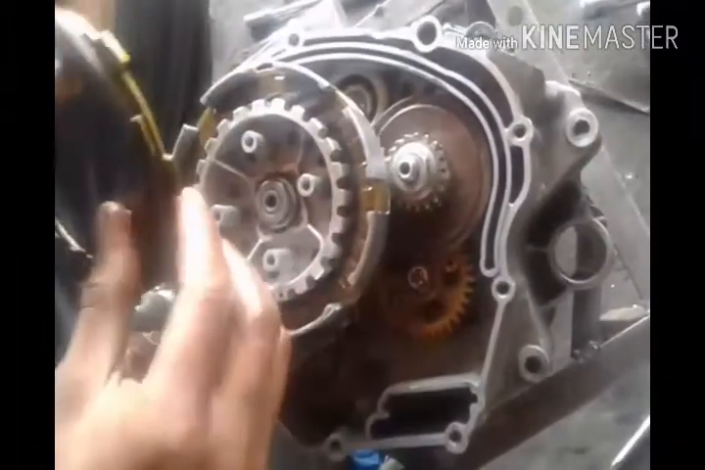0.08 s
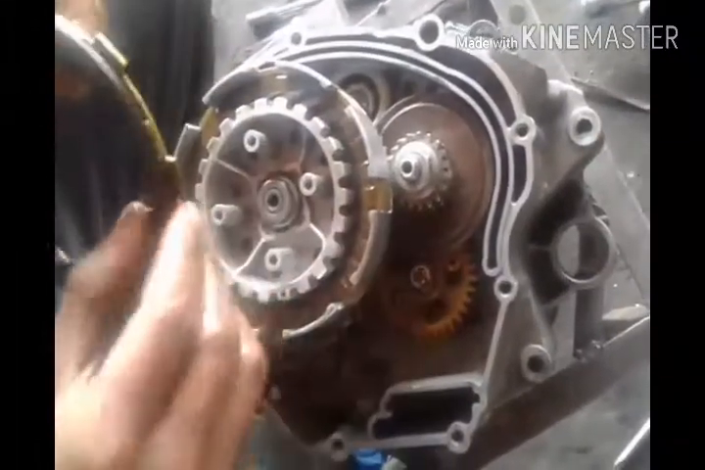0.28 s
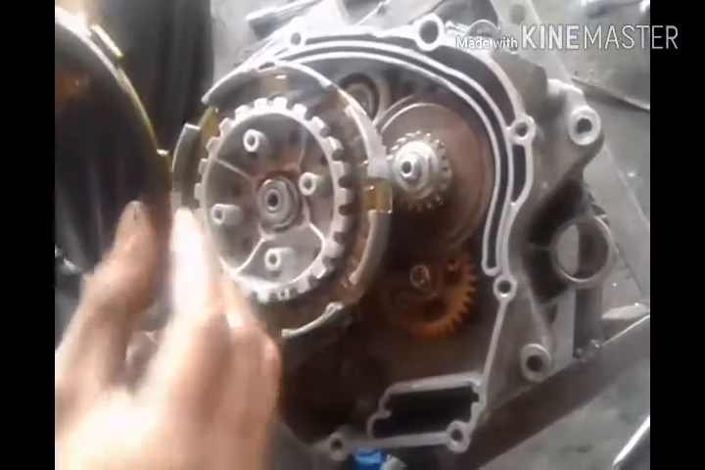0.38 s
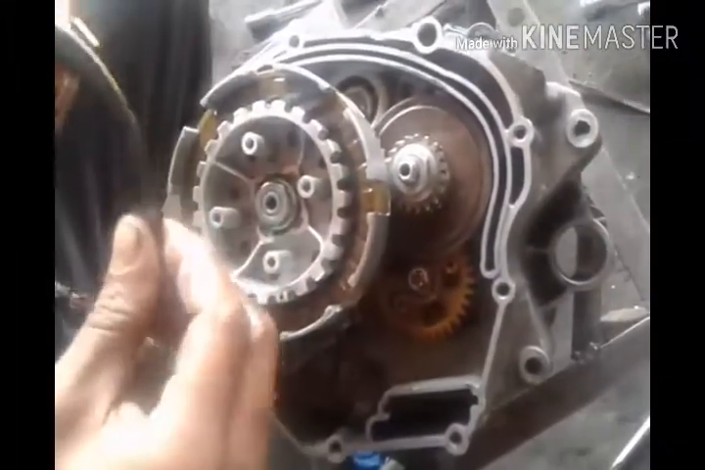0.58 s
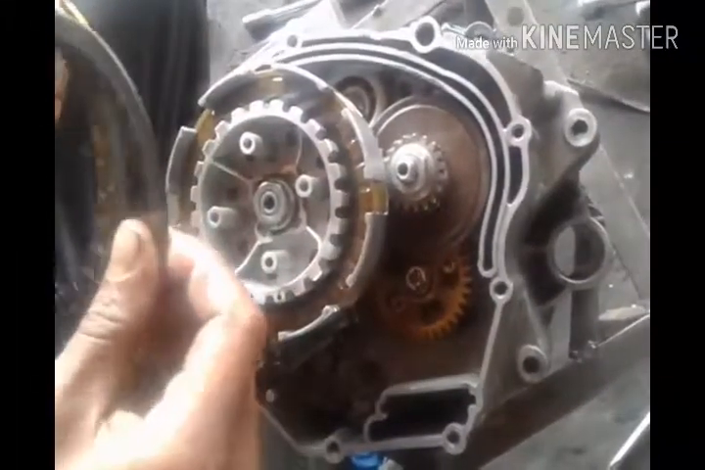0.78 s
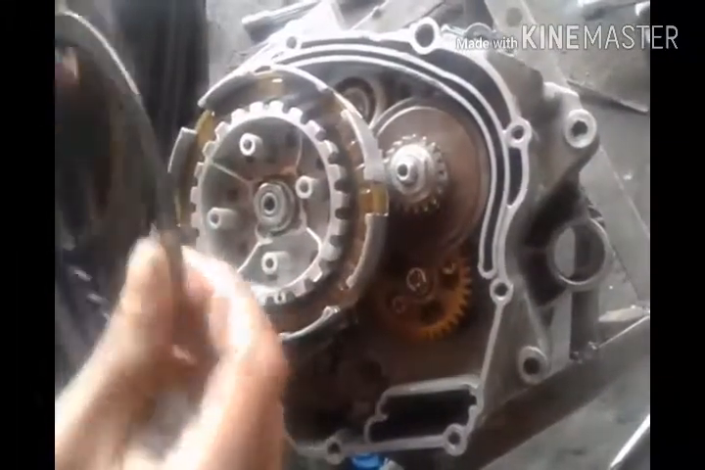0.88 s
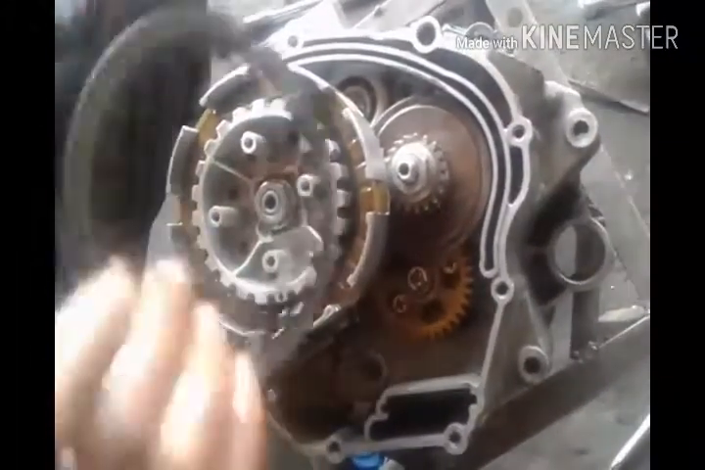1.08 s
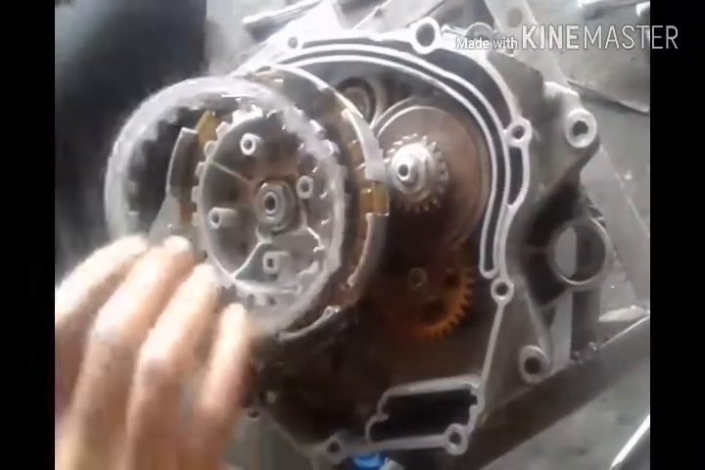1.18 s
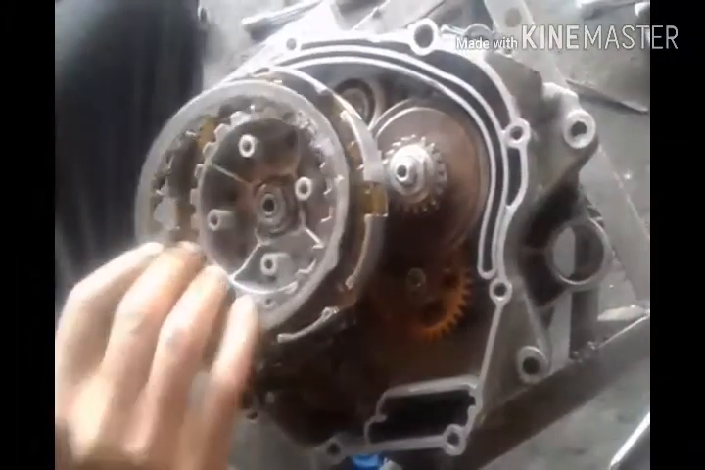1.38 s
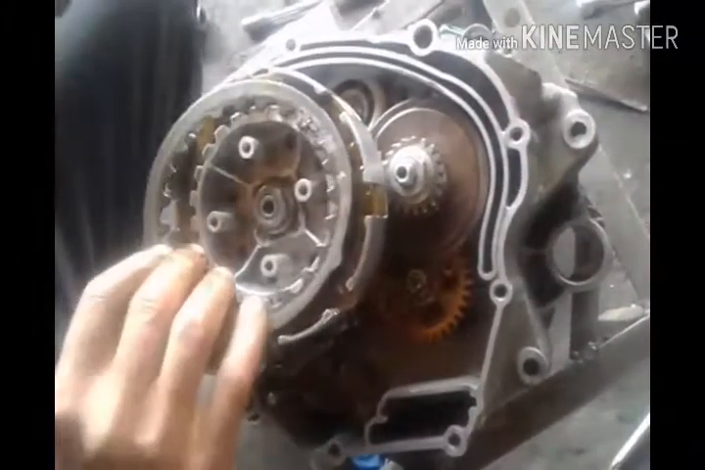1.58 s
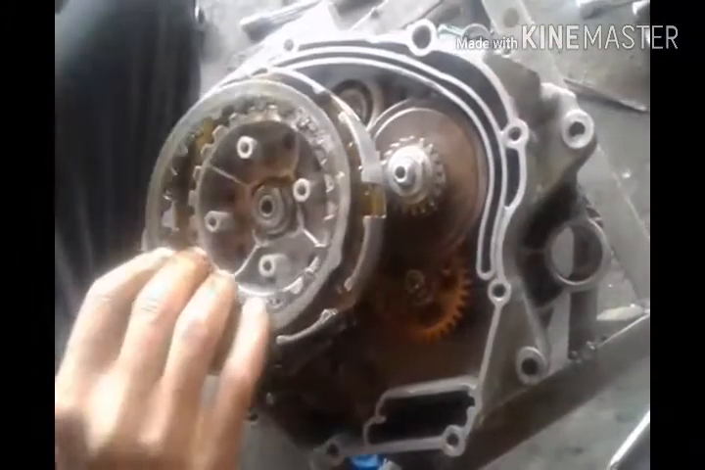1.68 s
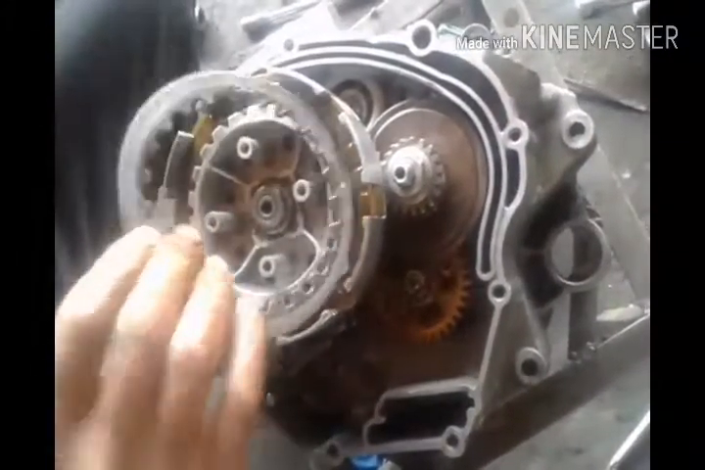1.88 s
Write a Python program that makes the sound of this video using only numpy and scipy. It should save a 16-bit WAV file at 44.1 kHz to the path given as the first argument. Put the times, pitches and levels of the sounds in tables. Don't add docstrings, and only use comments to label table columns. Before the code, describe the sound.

Metal parts clack and ring three times in an echoing workshop while a vehicle rumbles past outside

```python
import sys
import numpy as np
from scipy import signal
from scipy.io import wavfile
from scipy.ndimage import uniform_filter1d, minimum_filter1d

SR = 44100
rng = np.random.default_rng(int(sys.argv[2]) if len(sys.argv) > 2 else 0)


def generate_wav(signal):
    frames = np.transpose(np.atleast_2d(signal))
    scaled = np.clip(frames, -1, 1) * 32767
    pcm = np.round(scaled).astype(np.int16)
    wavfile.write(sys.argv[1], SR, pcm)


def invert_db(x):
    u = np.asarray(x, float) / 20
    return 10 ** u


N = 85995


def rms_one(x):
    return x / np.sqrt(np.mean(x ** 2) + 1e-20)


def in_time(rows):
    s, *columns = np.transpose(rows)
    return [np.interp(np.arange(N) / SR, s, column) for column in columns]


def at_hz(points, hz):
    point_hz, value = np.array(points).T
    return np.interp(np.log(hz), np.log(point_hz), value)


def drift(rate):
    step = 40
    pole = np.exp(-2 * np.pi * rate * step / SR)
    white = rng.standard_normal(N // step + 2002)
    slow = rms_one(signal.lfilter([1], [1, -2 * pole, pole ** 2], white)[2000:])
    return np.interp(np.arange(N) / step, np.arange(len(slow)), slow)


def tone(hz):
    return np.sin(2 * np.pi * np.cumsum(hz) / SR)


def ring(clicks, hz, t60):
    pole, angle = invert_db(-60 / (t60 * SR)), 2 * np.pi * hz / SR
    return signal.lfilter([0, np.sin(angle)], [1, -2 * pole * np.cos(angle), pole ** 2], clicks + 1e-18)


def band_pass(edges_hz):
    return signal.butter(2, edges_hz, "band", fs=SR, output="sos")


def bands(low_hz):
    edges = low_hz * 2 ** (np.arange(28) / 3)
    edges = edges[edges < 17000]
    return [(np.sqrt(a * b), band_pass([a, b])) for a, b in zip(edges, edges[1:])]


def hiss(spectrum, patchy_db):
    settle = 4000
    white = rng.standard_normal((2, N + settle))
    together = drift(12.0)
    total = np.zeros(N)
    for k, (hz, sos) in enumerate(bands(32)):
        flicker_db = patchy_db * (0.41 * together + drift(9.1))
        total += invert_db(at_hz(spectrum, hz) + flicker_db) * signal.sosfilt(sos, white[k % 2])[settle:]
    return rms_one(total)


# (frequency [Hz], level [dB per Hz])
STREET_COLOUR = [(30, -17.5), (180, -1.5), (650, -18), (1400, -18.5), (2500, -27), (4200, -17.5),
                 (7000, -36.5), (14000, -46.5)]


def street():
    return invert_db(-37) * hiss(STREET_COLOUR, patchy_db=2.48)


# (time [s], pitch [Hz], level [dB])
MOTOR_HUM = [
    (.35, 353.6, -45),
    (.5, 352, -36.5),
    (.72, 351, -39.5),
    (.8, 350, -34),
    (1.1, 346.3, -44),
    (1.45, 341.7, -48),
    (1.6, 342, -61.5),
]


def far_motor():
    hz, db = in_time(MOTOR_HUM)
    return invert_db(db + 0.5 + 2 * drift(13.0)) * tone(hz + drift(9.5))


# (time [s], nearness [dB], firing rate [Hz], boom of the tones above 3 times that rate [dB])
VEHICLE_PASS = [
    (0, -28, 80.87, 9),
    (.2, -8, 84.95, 7.5),
    (.4, -2, 84.12, 1.5),
    (.55, 1.5, 84.2, 3),
    (.68, 1, 83.95, -2),
    (.9, -6, 83.02, -3),
    (1.1, -6, 81.87, -1),
    (1.4, -13.5, 81.8, 2.5),
    (1.95, -19, 82.2, -7.5),
]
# (multiple of firing rate [ratio], level [dB])
PASS_TONES = [(1, -32.5), (1.5, -38), (2, -37.5), (2.5, -43.5), (3.2, -38.5), (3.5, -37.5), (4.8, -47.5)]
# (frequency [Hz], level [dB per Hz])
ROAR_COLOUR = [(40, -58), (75, 1), (290, -3.5), (540, -12), (1250, -12), (2300, -21.5), (4170, -14.5),
               (8000, -46.5)]


def vehicle():
    wobble_db, wobble_hz = 1, 1.07
    near_db, firing_hz, boom_db = in_time(VEHICLE_PASS)
    engine = np.zeros(N)
    for multiple, db in PASS_TONES:
        tone_db = db + 3 + boom_db * (multiple > 3) + wobble_db * drift(6.0)
        engine += invert_db(tone_db) * tone(multiple * firing_hz + wobble_hz * drift(6.9))
    roar = invert_db(-30 + 0.98 * near_db) * hiss(ROAR_COLOUR, patchy_db=2.5)
    return invert_db(near_db) * engine + roar


# (time [s], level [dB])
SLIDE_LEVEL = [
    (.27, -62.5),
    (.3, -42),
    (.5, -48),
    (.66, -42),
    (.9, -38.5),
    (1.03, -44.5),
    (1.09, -44),
    (1.2, -64),
    (1.42, -62),
    (1.6, -58),
]
# (frequency [Hz], level [dB per Hz])
RUB_COLOUR = [(2500, -27), (3500, -3), (4200, 12), (5200, -11.5), (7000, -22), (10000, -21), (14000, -32)]
KNOCK_BAND = [494, 2330]


def plates():
    knock_s, knock_db, knock_decay_s = 1.166, -30, 0.017
    after = np.arange(N) / SR - knock_s
    puff = rng.standard_normal(N) * (after > 0) * np.exp(-abs(after) / knock_decay_s)
    knock = signal.sosfilt(band_pass(KNOCK_BAND), puff + 1e-18)
    rub = invert_db(in_time(SLIDE_LEVEL)[0]) * hiss(RUB_COLOUR, patchy_db=1.5)
    return rub + invert_db(knock_db + 9) * knock


# (time [s], pitch [Hz], level [dB])
SQUEAK_PATH = [(1.17, 3900, -70), (1.19, 3910, -24), (1.225, 3990, -31), (1.28, 3940, -55),
               (1.41, 4160, -56), (1.44, 4100, -45), (1.478, 4040, -40), (1.52, 4036, -44),
               (1.55, 4075, -41), (1.6, 3950, -50), (1.635, 3945, -28), (1.74, 3970, -45), (1.8, 3970, -70)]


def squeak():
    unsteady_hz = 14
    hz, db = in_time(SQUEAK_PATH)
    return invert_db(db + 3 + 2 * drift(40)) * tone(hz + unsteady_hz * drift(60))


# (delay [s], level [dB])
ARRIVALS = [
    (0, -14),
    (.0055, -6),
    (.008, 0),
    (.013, -5),
    (.021, -2),
    (.039, -6),
    (.047, -5),
]


def contact_clicks(size):
    scatter_s, scatter_db = .0006, 1.0
    clicks = np.zeros(size)
    for lag, db in ARRIVALS:
        u, v = rng.standard_normal(2)
        arrival_s = abs(lag + (lag > 0) * scatter_s * u)
        clicks[int(arrival_s * SR)] += invert_db(db + scatter_db * v) * np.sign(v)
    return invert_db(-3) * (clicks / 2 + invert_db(-15) * ring(clicks, 3900, .006))


def tail_grains(t):
    grains_per_s, rise_s, tail_db = 4500, .009, -5
    shape = (2, len(t))
    grains = rng.standard_normal(shape) * (rng.random(shape) < grains_per_s / SR)
    return rms_one(grains) * invert_db(tail_db) * (1 - np.exp(-t / rise_s)) / 4


# (frequency [Hz], time to fall 60 dB [s])
ROOM_T60 = [(2000, 0.27), (4000, 0.33), (6000, 0.31), (9000, .45), (13000, 0.23)]


def room_decay(t, hz):
    return invert_db(-60 * t / at_hz(ROOM_T60, hz))


# (frequency [Hz], level [dB per Hz])
CRACK_COLOUR = [(1500, -35), (2350, -29.5), (3100, -3), (3800, 8.5), (5000, -1.5), (7000, -13.5),
                (9500, -41), (14000, -21.5)]


def crack(t, clicks, grains, bright_db):
    total = np.zeros(len(t))
    for k, (hz, sos) in enumerate(bands(1600)):
        band = signal.sosfilt(sos, (-1) ** k * clicks + grains[k % 2])
        total += invert_db(at_hz(CRACK_COLOUR, hz) + bright_db * (hz > 5000)) * room_decay(t, hz) * band
    return 14 * total


# (frequency [Hz], level [dB], time to fall 60 dB [s])
METAL_MODES = [(3490, -7.5, 0.033), (3700, 0, 0.044), (3760, 12, 0.04), (3960, 2, 0.16), (4140, -16, 0.36),
               (4490, -0.5, 0.12), (6060, -0.5, 0.027), (8450, -38, .06), (9050, -28, .06)]


def metal_ring(excitation, ring_db):
    total = np.zeros(len(excitation))
    for hz, db, t60 in METAL_MODES:
        scatter_db = rng.standard_normal()
        total += invert_db(db + ring_db - 7.5 + scatter_db) * ring(excitation, hz, min(t60, .3))
    return total


def thud(t):
    hz, lag_s = 594, .012
    push = ring(1. * (t == 0), hz, 0.023)
    return invert_db(-14) * np.roll(ring(push, hz, 0.067), int(lag_s * SR)) / 90


def blow(bright_db, ring_db):
    size = SR // 2
    t = np.arange(size) / SR
    clicks, grains = contact_clicks(size), tail_grains(t)
    excitation = clicks / 4 + grains[0] * room_decay(t, 4000)
    return crack(t, clicks, grains, bright_db) + metal_ring(excitation, ring_db) + thud(t)


# (time [s], strength [dB], brightness above 5 kHz [dB], ring [dB])
BLOW_TIMES = [
    (0.293, -30.5, -27, -13.5),
    (.415, -34.5, 5.5, -14),
    (.699, -7.5, 1, -14),
    (1.119, -12, 2.5, -11),
    (1.563, -11.5, 2, -16),
]


def blows():
    out = np.zeros(N + SR)
    for s, db, bright_db, ring_db in BLOW_TIMES:
        start = int(s * SR)
        out[start:start + SR // 2] += invert_db(db) * blow(bright_db, ring_db)
    return out[:N]


def scene():
    return (street() + far_motor() + vehicle() + plates() + squeak() + blows())[None]


def limit(x):
    threshold_db, ratio, release_db_per_s, look_ahead_s = -16.5, 0.43, 60, .017
    level_db = 10 * np.log10(uniform_filter1d(x ** 2, size=220) + 1e-12)
    wanted_db = ratio * np.maximum(level_db - threshold_db, 0)
    cut_db = -minimum_filter1d(-wanted_db, size=2 * int(look_ahead_s * SR) + 1)
    release_db = release_db_per_s * np.arange(N) / SR
    cut_db = np.maximum.accumulate(cut_db + release_db) - release_db
    return x * invert_db(-uniform_filter1d(cut_db, size=260))


TREBLE_EDGES = [6300, 7000, 7600, 8300, 9000, 10000, 11500, 14200]
# (time [s], added to the level a band needs [dB])
TREBLE_THRIFT = [(.05, 2), (.12, -1), (.21, 2), (.27, -1), (.33, 8), (.43, -1), (.5, 6), (.54, -6),
                 (.62, -4), (.85, 5), (.98, 8), (1.08, -4), (1.24, 4), (1.42, -4), (1.5, 2), (1.59, 0),
                 (1.63, 19), (1.75, -4), (1.86, 1), (1.95, -8)]


def drop_faint_treble(x):
    keep_db, scatter_db = -82, 2.5
    hz, s, z = signal.stft(x, SR, nperseg=2048, noverlap=1024)
    scatter = scatter_db * rng.standard_normal((8, z.shape[1]))
    need_db = keep_db + np.interp(s, *np.transpose(TREBLE_THRIFT)) + scatter
    keep = True
    for k, (low, high) in enumerate(zip(TREBLE_EDGES, TREBLE_EDGES[1:])):
        band = (hz >= low) & (hz < high)
        band_db = 10 * np.log10(np.mean(abs(z[band]) ** 2, axis=0) + 1e-14)
        keep = keep & (band_db > (need_db[7] + need_db[k]) / 2 - 5 * (k > 5))
        z[band] *= keep
    z[hz >= TREBLE_EDGES[-1]] = 0
    return signal.istft(z, SR, nperseg=2048, noverlap=1024)[1][:N]


def roll_off(x):
    return signal.sosfilt(signal.butter(12, 14960, fs=SR, output="sos"), x)


def record(dry):
    low_cut = signal.butter(2, 42, "high", fs=SR, output="sos")
    heard = signal.sosfilt(low_cut, dry)[0]
    mix = drop_faint_treble(limit(heard))[None]
    return roll_off(mix)


dry = scene()
out = record(dry)
generate_wav(out)
```